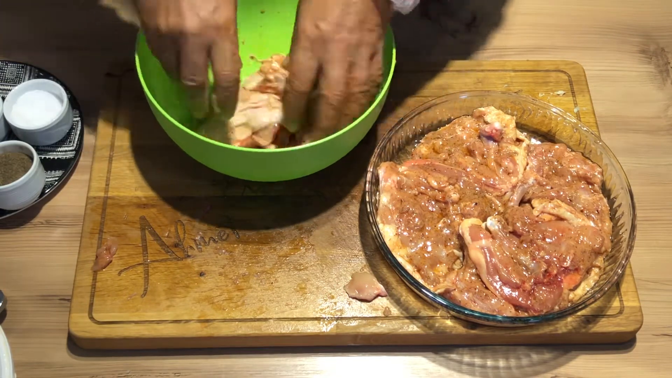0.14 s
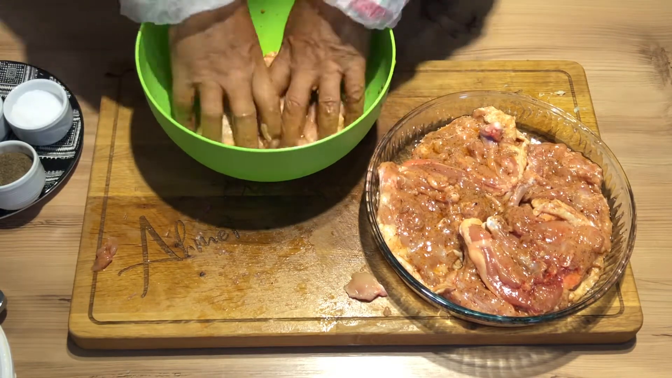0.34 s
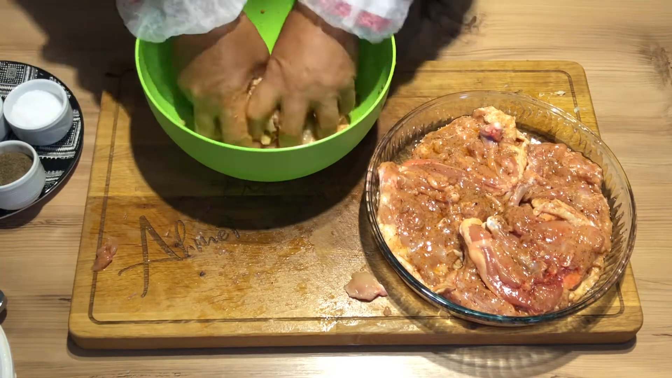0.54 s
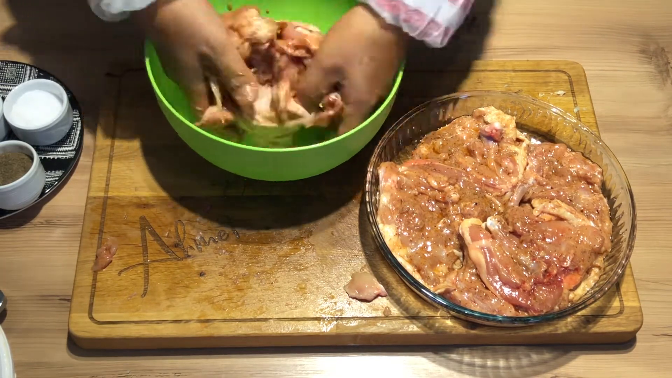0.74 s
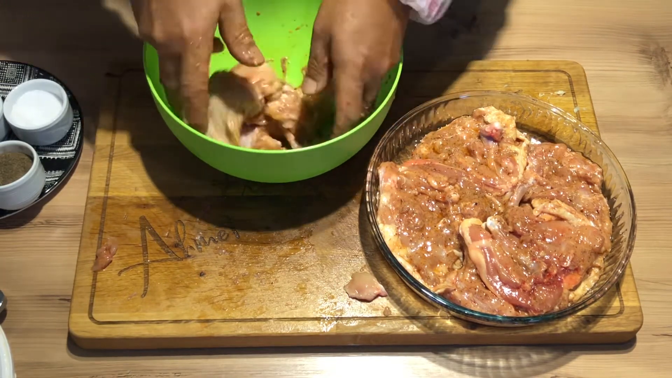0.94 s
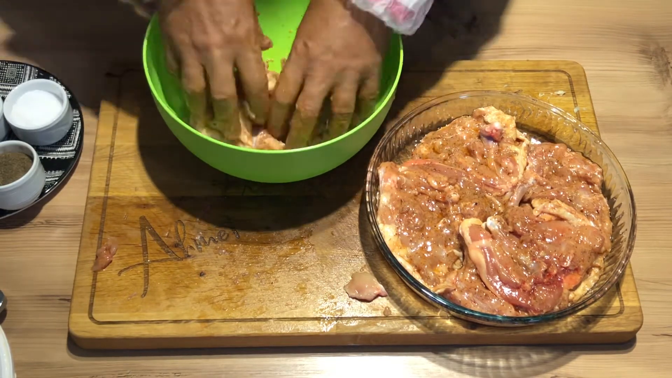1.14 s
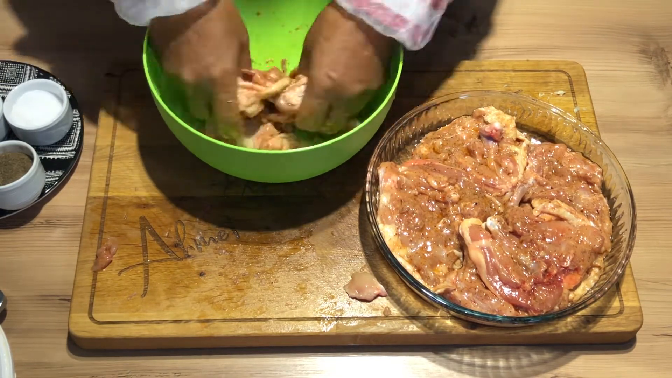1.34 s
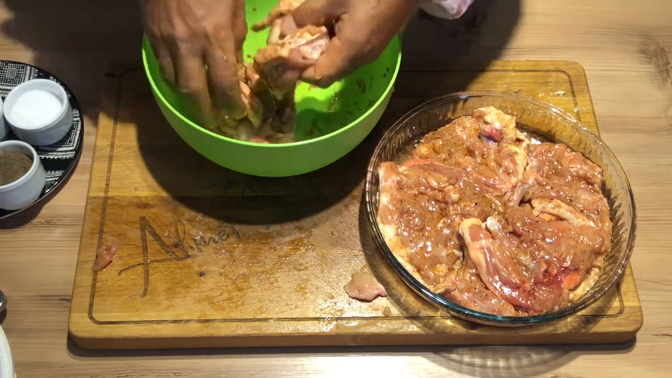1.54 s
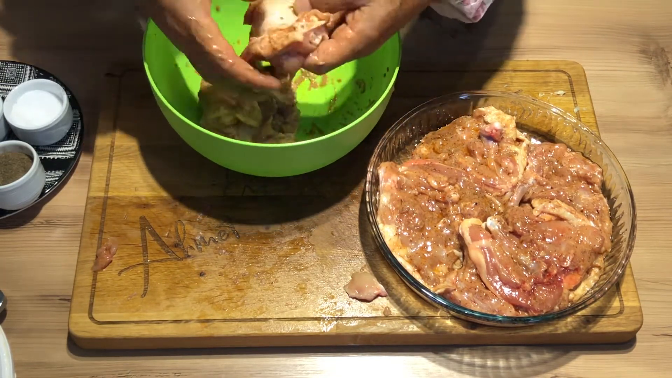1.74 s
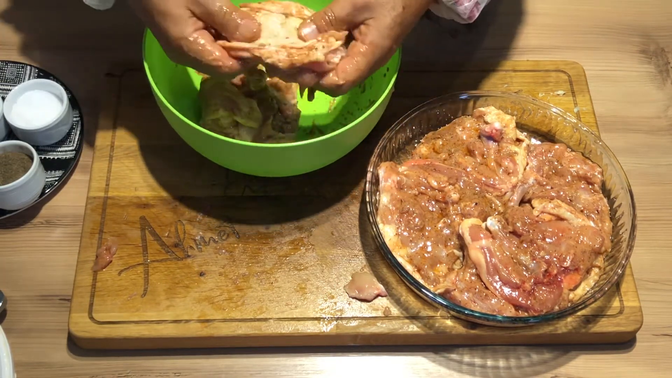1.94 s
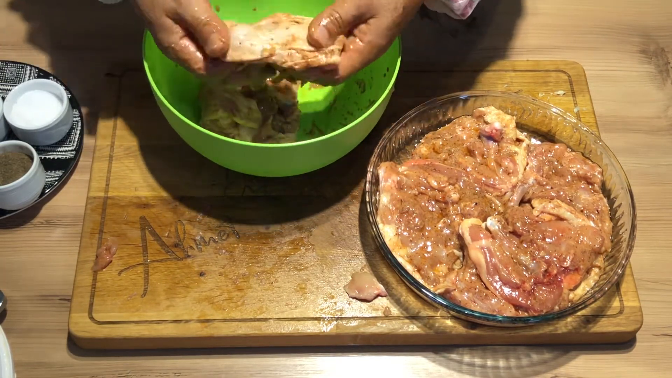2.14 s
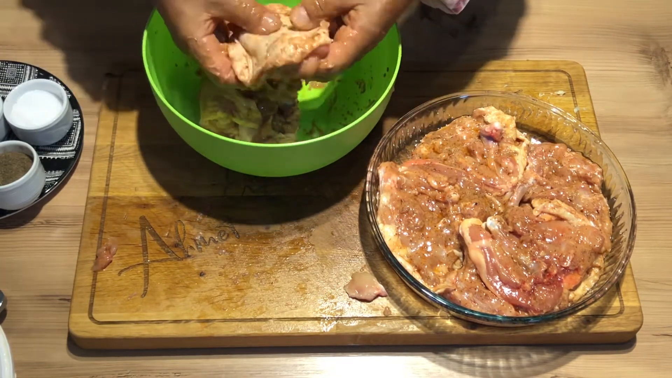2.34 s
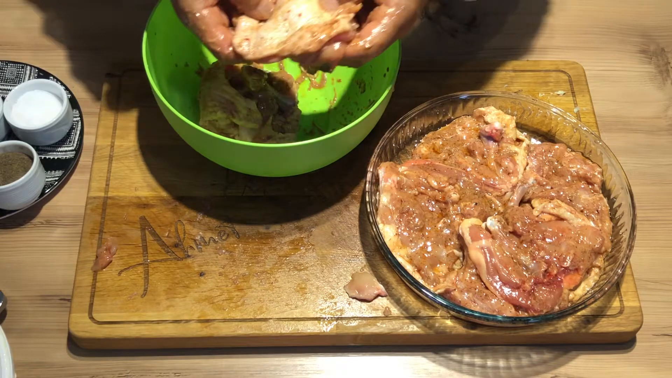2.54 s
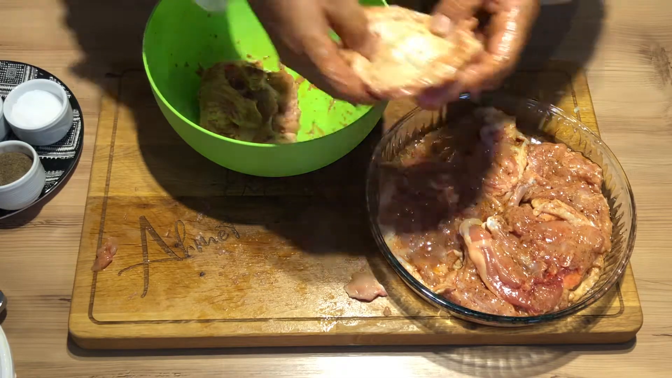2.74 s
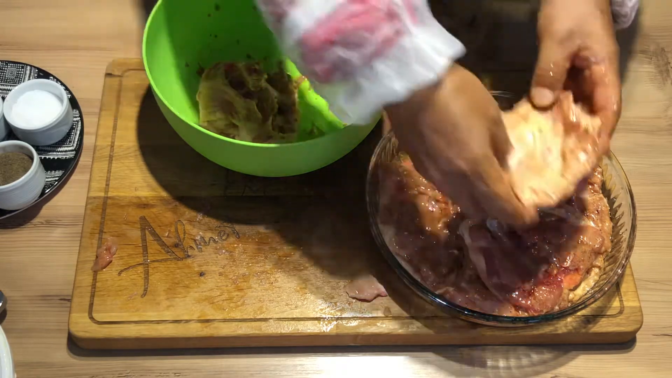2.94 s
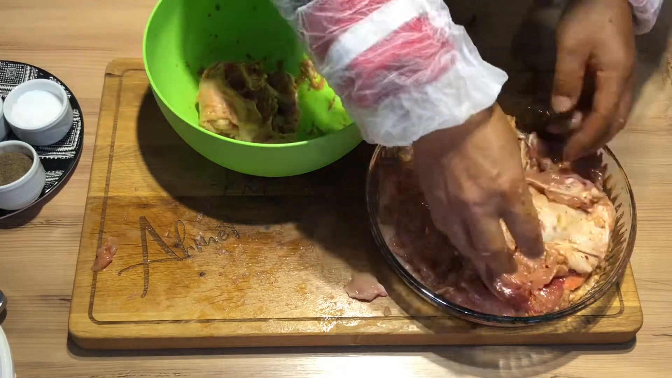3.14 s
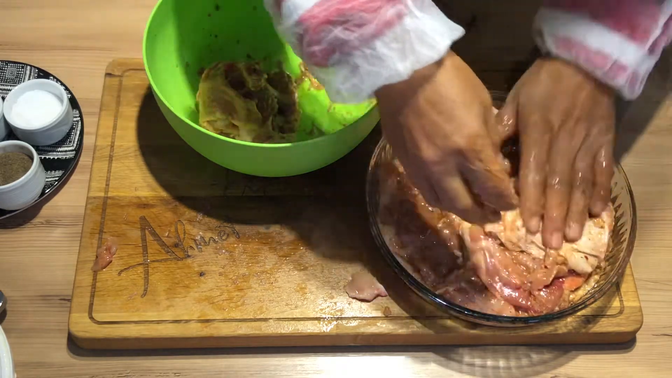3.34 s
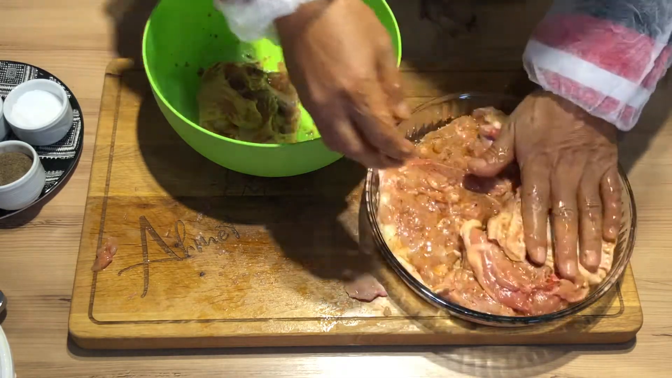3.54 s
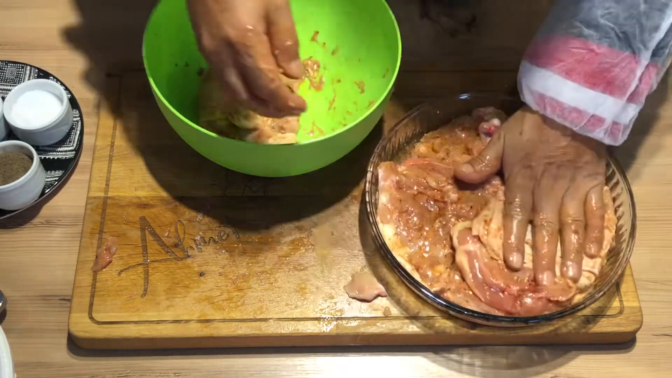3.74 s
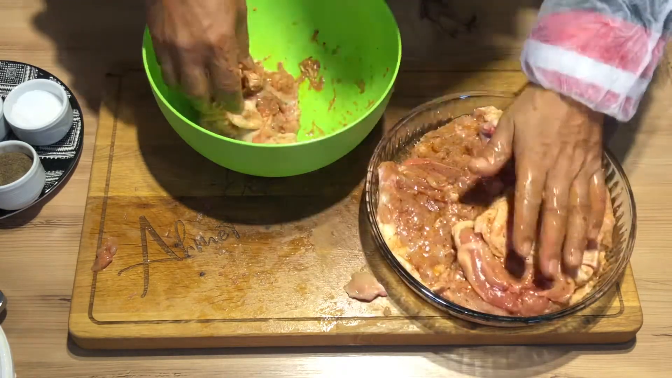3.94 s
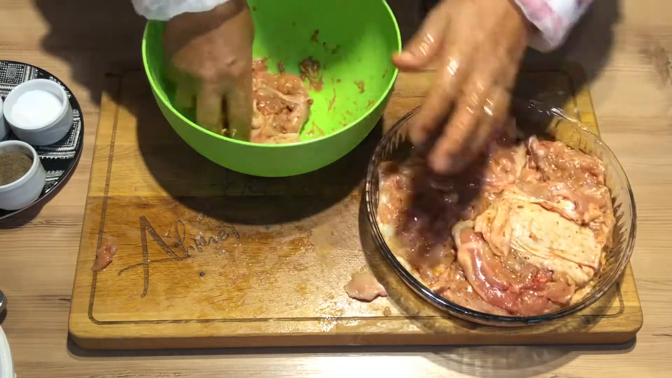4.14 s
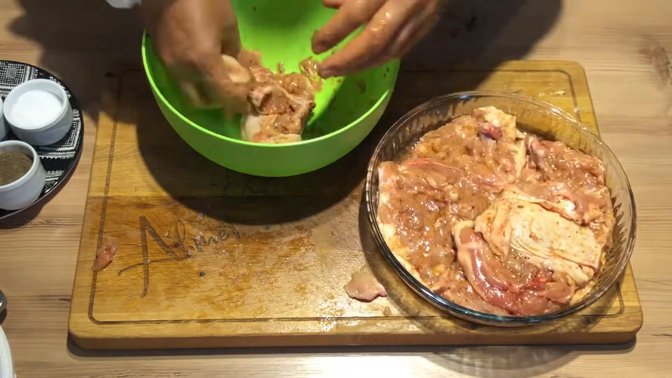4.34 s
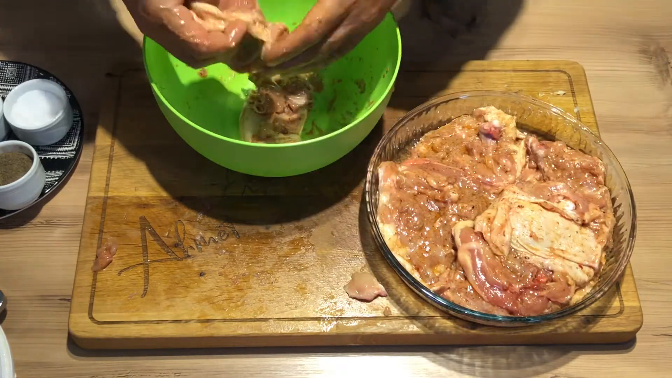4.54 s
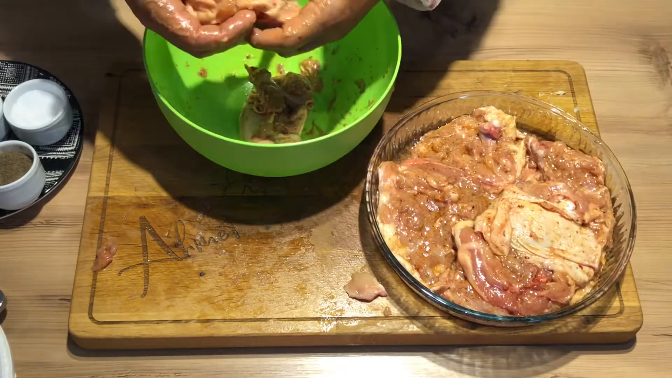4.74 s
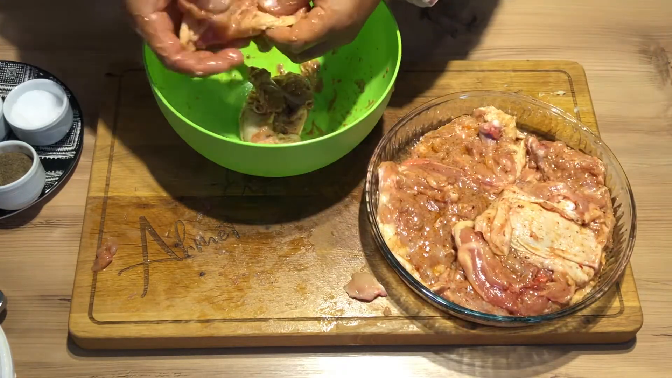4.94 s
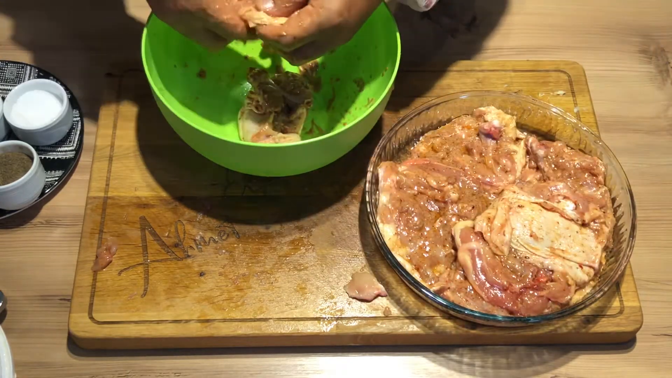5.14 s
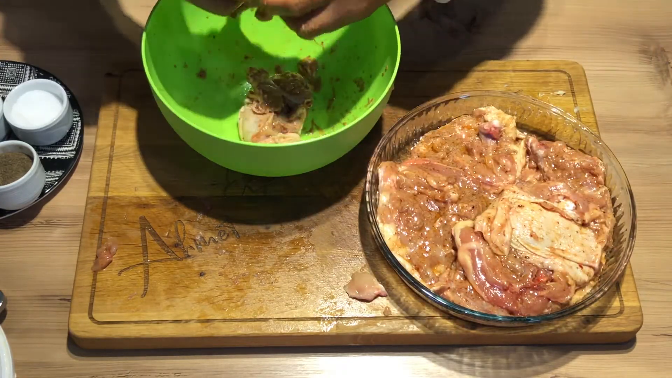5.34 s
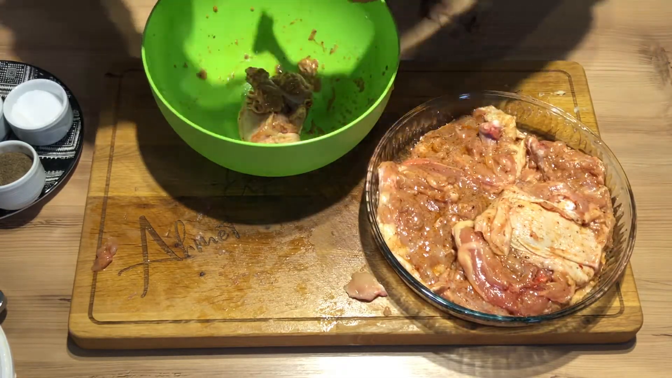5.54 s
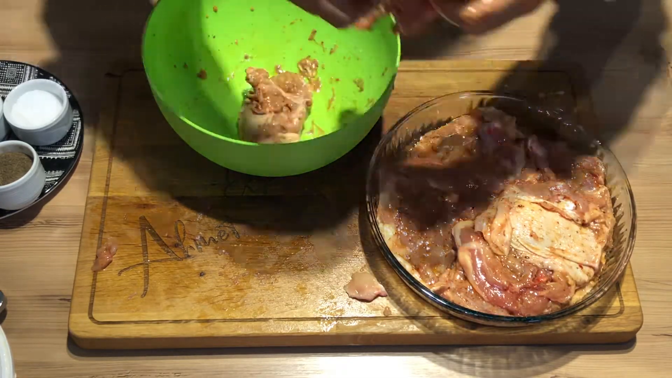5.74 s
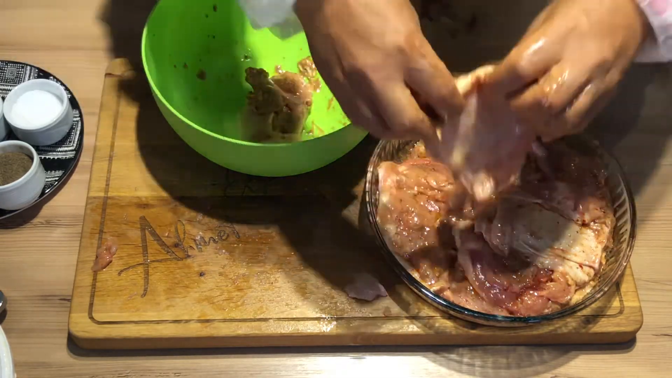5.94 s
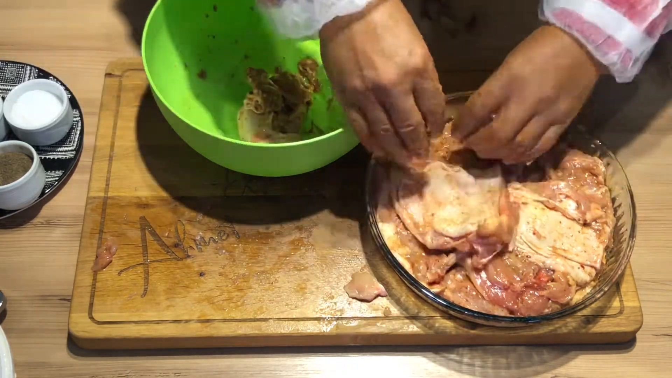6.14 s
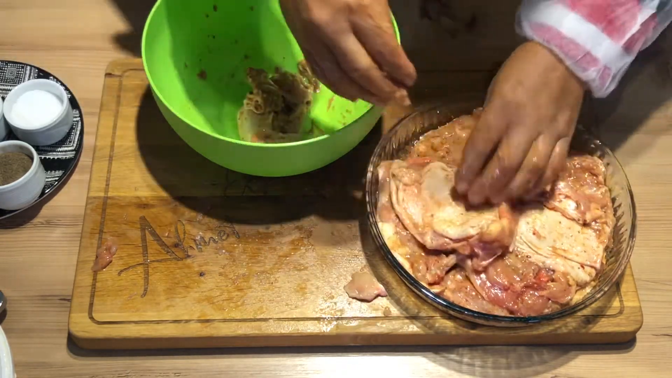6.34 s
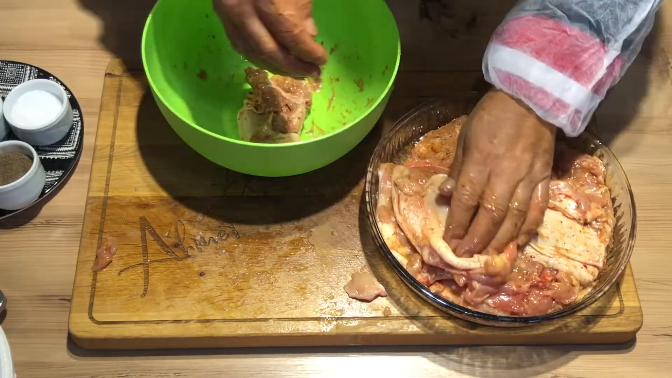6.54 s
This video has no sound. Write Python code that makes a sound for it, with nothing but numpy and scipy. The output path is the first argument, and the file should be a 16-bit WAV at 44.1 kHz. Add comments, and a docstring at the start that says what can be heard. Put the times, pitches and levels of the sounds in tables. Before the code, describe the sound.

In a small, hard-walled kitchen, a close microphone picks up raw chicken squelching and popping in marinade, with hollow knocks and soft thuds as the plastic bowl bumps a wooden board. The mixing eases and a piece slaps sharply onto other meat. After more sticky handling and a lull, another piece splats into the glass dish with a short, damped ring. An appliance hums faintly underneath.

```python
"""Hands turn marinated chicken in a plastic bowl on a wooden board, close to a single microphone.
Each grip squeezes out bubbles, the wet film crackles and pops, and the bowl knocks on the board.
Two pieces go into a full glass dish: the first claps shut on a pocket of air, the second lands with
a splat and rings the glass. A small, hard kitchen reverberates around it, over a faint appliance hum."""
import sys
import numpy as np
from scipy import signal
from scipy.fft import rfft, irfft
from scipy.io import wavfile

SR = 44100
rng = np.random.default_rng(int(sys.argv[2]) if len(sys.argv) > 2 else 0)


def materialize(psi):
    """Save the field psi as 16-bit PCM at rate SR to the path in sys.argv[1].

    A 1-D psi becomes a single channel; in a 2-D psi each row is a channel.
    """
    bounded = np.clip(np.atleast_2d(psi).T, -1, 1)
    quanta = np.round(bounded * 32767).astype(np.int16)
    wavfile.write(sys.argv[1], SR, quanta)


N = 290619
T = np.arange(N) / SR
AGE = T[:SR // 2]  # time since a blow

# fingers grip, press or peel the meat: t/s, length/s, squelch level/dB, film crackle level/dB
HAND_GRIPS = [(0, .04, -60, -72), (0.053, 0.058, -51.5, -68), (0.293, 0.085, -55, -60),
              (0.381, 0.31, -49, -57), (0.711, 0.032, -49, -59), (0.841, 0.12, -52, -58),
              (1.177, 0.058, -54.5, -61), (1.269, 0.16, -63, -62.5), (1.506, 0.089, -62.5, -78),
              (1.89, .3, -71, -70), (2.275, .13, -65, -70.5), (3.397, 0.022, -61, -61),
              (3.538, .05, -63.5, -71), (3.673, 0.053, -52.5, -68), (3.848, 0.072, -57, -65),
              (4.065, .1, -54.5, -60), (4.19, 0.19, -65, -68), (4.828, 0.082, -63, -68),
              (5.738, 0.43, -69, -77.5), (6.416, .15, -82, -74.5)]
# tone of the squelch: f/Hz, relative level/dB
SQUELCH_SPECTRUM = [(200, 14.5), (450, -2.5), (700, 2.5), (1100, -3), (2000, 3), (3500, -3.5), (6000, -8),
                    (9000, -28)]
# larger air pockets pop: t/s, level before damping/dB, f/Hz, raggedness/octaves
AIR_POPS = [(.057, -37.5, 7600, 1.1), (.102, -39, 5060, 0.68), (.301, -36.5, 2000, .6),
            (0.414, -37, 1500, .35), (0.555, -41, 1200, 0.36), (.59, -40.5, 1108, 0.25),
            (0.616, -33, 4970, .5), (0.664, -37.5, 1930, 0.58), (.867, -36, 2180, 0.38),
            (0.943, -34, 6540, 1.6), (1.214, -37, 3520, 0.74), (1.296, -38.5, 3470, .3),
            (1.306, -34, 5870, .45), (1.35, -40, 2090, .35), (1.371, -42, 4380, 0.95),
            (1.464, -34.5, 1923, 0.35), (1.544, -44, 4350, 0.66), (1.76, -40.5, 5540, 0.25),
            (1.834, -43.5, 4020, 0.75), (1.888, -40.5, 5060, 0.47), (2.048, -41.5, 12600, 0.23),
            (2.275, -39.5, 2670, 0.63), (2.912, -40.5, 1400, 0.6), (2.948, -39.5, 5330, 0.89),
            (3.411, -40.5, 1890, 0.65), (3.461, -40, 4390, 0.2), (3.679, -32.5, 3740, 0.54),
            (3.761, -35, 3990, 0.35), (3.796, -38, 3480, 0.55), (3.852, -40, 12400, 0.44),
            (3.863, -43, 4500, 1.4), (3.902, -37.5, 1310, .35), (3.903, -38.5, 4250, .9),
            (3.926, -38.5, 6100, .6), (4.041, -37, 2300, 0.69), (4.0596, -36.5, 2420, 0.79),
            (4.15, -41, 3590, 0.98), (4.181, -36.5, 4600, .8), (4.229, -42.5, 5230, 0.35),
            (4.292, -38.5, 6370, .45), (4.376, -46, 10200, 0.38), (4.566, -49, 5780, 0.71),
            (4.8049, -39, 2670, 0.7), (4.834, -33, 3940, 0.42), (5.203, -46.5, 5440, 1.15),
            (5.493, -42, 11800, .3), (6.48, -42, 2370, 0.45)]
# bowl on board: t/s, level/dB, f of the flexing base/Hz, relative load/dB, relative contact hardness/dB
BOWL_KNOCKS = [(0.049, -27.5, 543, -1, 1.5), (0.066, -36, 537, 8, -2), (0.085, -34, 570, 4, -4),
               (0.301, -34.5, 465, 2, 1), (0.358, -35.5, 535, -2, -1), (0.758, -22, 462, 0.5, -0.5),
               (0.867, -24, 480, -3, -1), (0.907, -28.5, 550, 2, -16), (1.193, -45.5, 600, 7, 8),
               (1.446, -28.5, 477, 6, 5), (1.465, -19.5, 516, -2.5, -6), (2.908, -48.5, 356, -6, 0),
               (3.68, -41, 566, -2, 11), (4.060, -41.5, 390, 8.5, -7), (5.111, -37, 466, 5.5, -1.5)]
# modes of the loaded bowl: f/Hz, relative level/dB, t60/s
BOWL_MODES = [(332.4, -18, 0.18), (389, -13, 0.14), (425, -15.5, .08), (506, -21, 0.2), (561, -15.5, .3),
              (562, -29, 0.085), (655, -37, 0.18)]
# the weight of the meat shakes board and table: t/s, level/dB, f/Hz
TABLE_THUDS = [(.005, -45.5, 75.5), (.21, -50, 79), (0.331, -44, 94), (.475, -40, 94), (.51, -37.5, 83.4),
               (0.676, -45, 79), (.919, -39.5, 148), (1.018, -43, 84), (3.04, -56.5, 134),
               (3.668, -48, 110), (4.07, -51, 110), (6.088, -47, 68), (6.101, -40, 130)]
# modes of the air pocket between two pieces: f/Hz, relative level/dB, t60/s
POCKET_MODES = [(688, -16, 0.046), (873, -11, 0.031), (947, -20, 0.054), (1047, -19.5, 0.053),
                (1220, -31, .025), (2950, -15.5, 0.027), (3470, -19, .012)]
# wet flesh lands: t/s, level/dB, length/s, squirt f/Hz, relative overtones/dB, relative spray/dB
FLESH_SPLATS = [(3.0279, -30.5, 0.0026, 3430, -16, -13), (3.0306, -17.5, 0.00053, 3400, -2, -8.5),
                (3.031, -26.5, 0.0048, 3280, -13, -9), (3.676, -48.5, 0.025, 893, -17, -8.5),
                (4.057, -51.5, 0.022, 1955, -23, -4), (6.0755, -39.5, 0.0073, 1700, -9, -3),
                (6.0814, -29.5, 0.0062, 2316, 2, 1.5), (6.0918, -29, 0.0032, 2470, -2.5, 6)]
# resonances of the slit the marinade squirts from: multiple of the squirt's f, relative level/dB
SLIT_MODES = [(2.22, 0.5), (3.35, -0.5)]
# tone of the spray: f/Hz, relative level/dB
SPRAY_SPECTRUM = [(30, -37), (110, 14), (300, 6.5), (550, 0), (900, -4), (1500, 2.5), (3000, -2.5),
                  (5000, 2), (7500, -3), (11000, -7.5), (15000, -4.5)]
# modes of the full glass dish: f/Hz, relative level/dB, t60/s
DISH_MODES = [(251.4, -10.5, 0.34), (329, -2, .15), (380, -7, 0.2), (546.4, -7, 0.22), (1484, -2.5, 0.11),
              (2253, -6, 0.14), (2484, -3, 0.17), (2555, -16, 0.51), (2560, -9, 0.09), (5600, -5, 0.052),
              (6200, -9, 0.038), (8140, 9, 0.037)]
# echoes off the nearest walls: delay/s, level/dB
WALL_ECHOES = [(0.017, -8.5), (0.0376, -10.5), (0.0504, -8.5), (0.074, -21)]
# reverberation of the kitchen: f/Hz, t60/s, level/dB
REVERB_BANDS = [(101, 0.72, 0.5), (390, 0.56, -1), (905, 0.65, -0.5), (1920, 0.66, -3), (2900, 0.55, -3),
                (5970, 0.46, -4.5), (10100, 0.27, -6.5), (16100, 0.21, -5)]
# room tone of the kitchen: f/Hz, relative level/dB
ROOM_TONE_SPECTRUM = [(20, -36), (45, -4.5), (75, -4.5), (150, -10.5), (300, -8), (600, -13.5),
                      (1000, -13.5), (2000, -21.5), (4000, -27), (5650, -30), (5900, -21.5), (6150, -27.5),
                      (8000, -33.5), (16000, -34.5)]
# hum and whine of an appliance: f/Hz, level/dB
APPLIANCE_TONES = [(98, -73.5), (146, -72.5), (242, -72.5), (587, -71), (3671, -84)]


def kneading():
    """Squeezed marinade bubbles up between the pieces while the sticky film crackles finely."""
    swarm = bubbles(per_s=2200, lo_hz=347, hi_hz=7830, spread_db=4.0, cycles=10.8)
    squelch = colour(swarm, SQUELCH_SPECTRUM)
    crackle = bubbles(per_s=1400, lo_hz=5680, hi_hz=15300, spread_db=6.5, cycles=11)
    squeeze, peel = np.zeros((2, N))
    for start, length, squelch_db, crackle_db in HAND_GRIPS:
        pressure = grip_pressure(start, length)
        squeeze = np.maximum(squeeze, undb(squelch_db) * pressure)
        peel = np.maximum(peel, undb(crackle_db) * pressure)
    return squeeze * squelch + peel * crackle


def grip_pressure(start, length, attack_s=0.0095, sag_db_per_s=28, release_t60=0.25):
    """A grip builds up, slackens as the marinade escapes, and lets go; 0 to 1."""
    age = np.maximum(T - start + attack_s / 2, 0)
    rise = np.minimum(age / attack_s, 1)
    release = fade(np.maximum(T - start - length, 0), release_t60)
    return rise * undb(-sag_db_per_s * age) * release


def bubbles(per_s, lo_hz, hi_hz, spread_db, cycles):
    """A swarm of tiny bubbles, most faint and a few strong; rms 1."""
    out = np.zeros(N)
    for when, pitch, faintness, sustain, bend in rng.random((int(per_s * N / SR), 5)):
        hz = lo_hz * (hi_hz / lo_hz) ** pitch
        gain = undb(-spread_db * np.log(max(faintness, .02))) * (hz / lo_hz) ** 0.73
        add(out, when * N / SR, gain * bubble(hz, cycles * (.5 + sustain), glide=0.4 * bend - .1))
    return unit(out)


def bubble(hz, cycles, glide):
    """A bubble swells over its first cycles and rings out while its pitch glides; peak 1."""
    life = max(cycles, 2) / np.sqrt(hz * 2000)  # cycles count at 2 kHz; higher bubbles ring for more
    t = T[:int(life * SR) + 3]
    phase = 2 * np.pi * hz * t * (1 + glide * t / life / 2)
    swell = 1 - np.exp(-(t * hz / 1.32) ** 2)
    wave = np.sin(phase) * fade(t, life) * swell
    return wave / np.abs(wave).max()


def pops(tear_s=0.0032, tear_db=-6, damping_db_per_octave=6):
    """A cavity rings briefly; the more raggedly its film tears, the weaker the ring, the wider the fizz."""
    out = np.zeros(N)
    for s, db, hz, ragged in AIR_POPS + sticky_threads():
        octaves = np.clip(ragged, .1, 2)
        fizz = band_noise(hz / 2 ** octaves, hz * 2 ** octaves, size=1024)
        tear = fizz * np.exp(-(T[:1024] / tear_s) ** 2)
        add(out, s, undb(db - damping_db_per_octave * octaves) * bubble(hz, cycles=17, glide=.05))
        add(out, s, undb(db + tear_db) * np.sqrt(octaves) * tear)
    return out


def sticky_threads(per_s=25, lo_hz=4580, hi_hz=15700, spread_db=4, ragged_octaves=0.42):
    """Threads snap at random during each firm grip and just after it; rows like those of AIR_POPS."""
    min_crackle_db, linger_s = -76, .12
    rows = []
    for start, length, _, crackle_db in HAND_GRIPS:
        if crackle_db < min_crackle_db:
            continue
        span = length + linger_s
        db = -52.5 + 0.39 * (crackle_db - min_crackle_db)  # a stickier grip has louder threads
        for when, pitch, strength in rng.random((round(per_s * span), 3)):
            hz = lo_hz * (hi_hz / lo_hz) ** pitch
            rows.append((start + when * span, db + spread_db * (2 * strength - 1), hz, ragged_octaves))
    return rows


def bowl_knocks(flex_s=0.0023):
    """The foot ticks on the board, the base flexes, the wall rings on and the load thumps after it."""
    out = np.zeros(N)
    swell = (AGE / flex_s) ** 2 * np.exp(2 - 2 * AGE / flex_s)  # peaks at 1 after flex_s
    for s, db, hz, load_db, hard_db in BOWL_KNOCKS:
        base = swell * np.sin(2 * np.pi * hz * AGE)
        wall = ring(BOWL_MODES, detune=0.0037) * onset(0.0049)
        load = ring([(126.8, -11, 0.11), (176.5, -14, 0.097)], detune=0.011) * onset(0.0077)
        contact = band_noise(850, 1860, len(AGE)) * fade(AGE, t60=0.051) * undb(-16.5)
        add(out, s, undb(db) * (base + wall + undb(load_db) * load + undb(hard_db) * contact))
    return out


def table_thuds(t60=0.16):
    """Soft, slow pushes on the meat set the table swinging."""
    out = np.zeros(N)
    for s, db, hz in TABLE_THUDS:
        add(out, s, ring([(hz, db, t60)]) * onset(0.0012))
    return out


def air_clap(at_s=3.0305, db=-2.6, start_hz=4600, end_hz=980, drop_s=.00036):
    """Trapped air bursts through a widening gap as a falling chirp, then the pocket rings; returns both."""
    turns = end_hz * AGE + (start_hz - end_hz) * drop_s * onset(drop_s)
    chirp = -np.sin(2 * np.pi * turns) * fade(AGE, t60=0.0055) * onset(.00015)
    # so small an opening radiates little bass, and the soft flesh swallows the treble
    gap = signal.butter(3, [600, 5000], "band", fs=SR, output="sos")
    swell = 1 - np.exp(-(AGE / .0022) ** 2)
    burst, pocket = np.zeros((2, N))
    add(burst, at_s, undb(db) * signal.sosfilt(gap, chirp))
    add(pocket, at_s, undb(db) * ring(POCKET_MODES) * swell)
    return burst, pocket


def splats():
    """Folds of flesh land one after another, each with a pitched squirt and a wide spray."""
    out = np.zeros(N)
    for s, db, length, hz, overtones_db, spray_db in FLESH_SPLATS:
        overtones = [(multiple * hz, overtones_db + slit_db) for multiple, slit_db in SLIT_MODES]
        squirt = sum(undb(part_db) * band_noise(part_hz / 1.073, part_hz * 1.184, len(AGE))
                     for part_hz, part_db in [(hz, 0.01)] + overtones)
        spray = undb(spray_db) * colour(rng.standard_normal(len(AGE)), SPRAY_SPECTRUM)
        add(out, s, undb(db) * (squirt + spray) * np.exp(-(AGE / length) ** 2))
    return out


def glass_dish(at_s=6.081, db=-35.5):
    """The second piece sets the glass ringing briefly, damped by the meat in it."""
    out = np.zeros(N)
    add(out, at_s, undb(db) * ring(DISH_MODES) * onset(0.0075))
    return out


def kitchen(direct, echo_top_hz=900):
    """The microphone hears the direct sound, dull wall echoes and a dense tail whose treble dies first."""
    band_hz, band_t60, band_db = np.transpose(REVERB_BANDS)
    t = T[:SR]
    log_f = np.log(np.maximum(np.arange(SR // 2 + 1), 1))
    noise = rfft(rng.standard_normal(SR))
    tail = 0
    for share, t60, db in zip(np.eye(len(band_hz)), band_t60, band_db):
        band = irfft(noise * np.interp(log_f, np.log(band_hz), share), SR)
        equal_energy = np.sqrt(2 * np.log(1000) / t60 / SR)
        tail = tail + undb(db) * band * fade(t, t60) * equal_energy
    build_up = 1 - np.exp(-(t / 0.00066) ** 2)
    out = direct + signal.fftconvolve(direct, tail * build_up)[:N]
    dull = signal.sosfilt(signal.butter(1, echo_top_hz, fs=SR, output="sos"), direct)
    for delay, db in WALL_ECHOES:
        add(out, delay, undb(db) * dull)
    return out


def room_tone(air_db=-62):
    """Still kitchen air and the faint, wavering hum of an appliance."""
    out = undb(air_db) * colour(rng.standard_normal(N), ROOM_TONE_SPECTRUM)
    for hz, db in APPLIANCE_TONES:
        drift = 0.019 * np.cumsum(rng.standard_normal(N))
        out += undb(db) * np.sqrt(2) * np.sin(2 * np.pi * hz * T + drift)
    return out


def undb(db):
    """Decibels to gain."""
    return 10 ** (np.asarray(db) / 20)


def unit(x):
    """Scale to an rms of 1."""
    return x / np.sqrt(np.mean(x ** 2))


def add(track, s, sound):
    """Mix a sound into the track from time s on."""
    i = max(int(s * SR), 0)
    track[i:i + len(sound)] += sound[:max(N - i, 0)]


def colour(x, points):
    """Shape a sound by points of f/Hz, level/dB; rms 1."""
    hz, db = np.transpose(points)
    f = np.maximum(np.fft.rfftfreq(len(x), 1 / SR), 1)
    gain = undb(np.interp(np.log(f), np.log(hz), db))
    return unit(irfft(rfft(x) * gain, len(x)))


def band_noise(lo_hz, hi_hz, size):
    """Noise between two edges; rms 1."""
    sos = signal.butter(2, [lo_hz, min(hi_hz, SR / 2 - 1000)], "band", fs=SR, output="sos")
    return unit(signal.sosfilt(sos, rng.standard_normal(size)))


def onset(rise_s):
    """Rise from 0 to 1 after a blow, with time constant rise_s."""
    return 1 - np.exp(-AGE / rise_s)


def fade(t, t60):
    """Exponential decay, 60 dB down after t60."""
    return np.exp(-np.log(1000) * t / t60)


def ring(modes, detune=0.):
    """Damped sines from rows of f/Hz, level/dB, t60/s; detune scatters their pitch."""
    out = 0
    for hz, db, t60 in modes:
        detuned_hz = hz * (1 + detune * rng.standard_normal())
        out = out + undb(db) * fade(AGE, t60) * np.sin(2 * np.pi * detuned_hz * AGE)
    return out


def scene(burst_aimed=0.52, pops_aimed=0.18):
    """All in one kitchen; a share of the burst and pops goes straight up to the microphone and stays dry."""
    burst, pocket = air_clap()
    snaps = pops()
    handling = bowl_knocks() + table_thuds() + kneading() + splats() + glass_dish() + pocket
    into_room = handling + (1 - burst_aimed) * burst + (1 - pops_aimed) * snaps
    on_axis = burst_aimed * burst + pops_aimed * snaps
    return (kitchen(into_room) + on_axis + room_tone())[None]


def record(dry, low_cut_hz=45, top_hz=16000):
    """The close microphone drops the deepest bass and the recorder cuts the top."""
    thin = signal.sosfilt(signal.butter(2, low_cut_hz, "high", fs=SR, output="sos"), dry)
    return signal.sosfilt(signal.ellip(10, .2, 70, top_hz, fs=SR, output="sos"), thin)


dry = scene()
out = record(dry)
materialize(out)
```